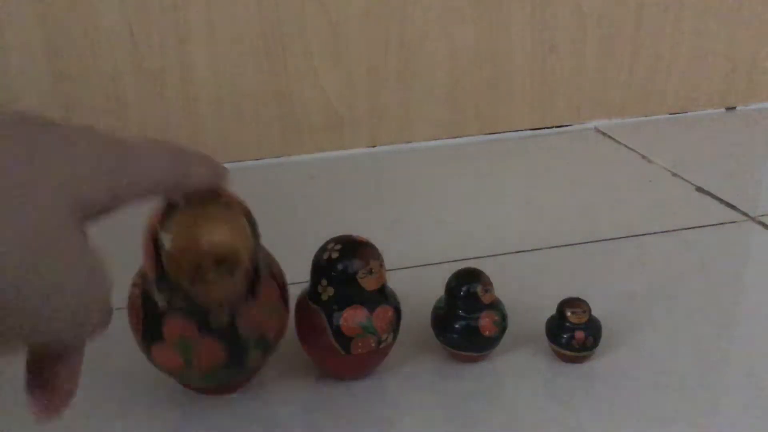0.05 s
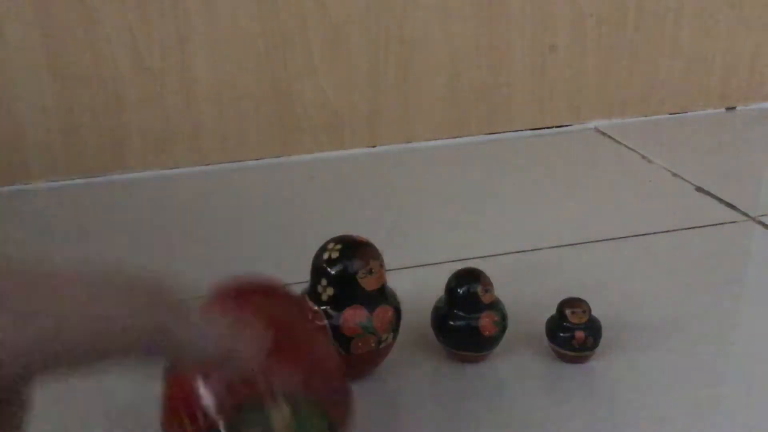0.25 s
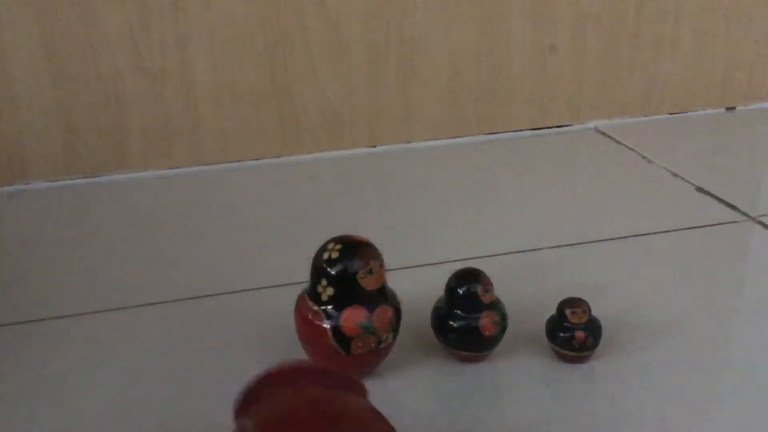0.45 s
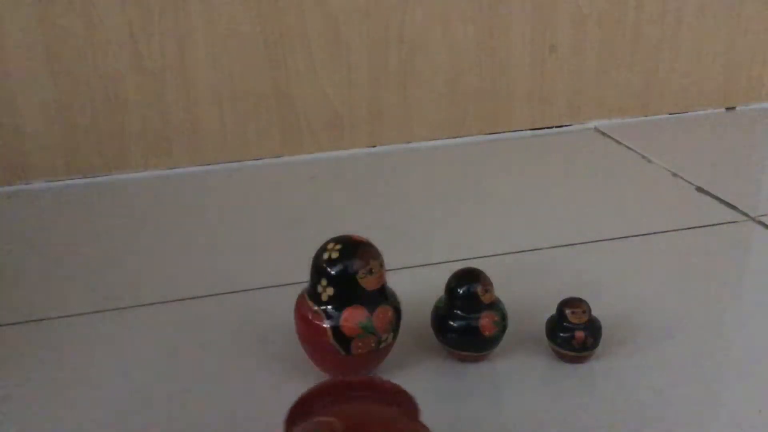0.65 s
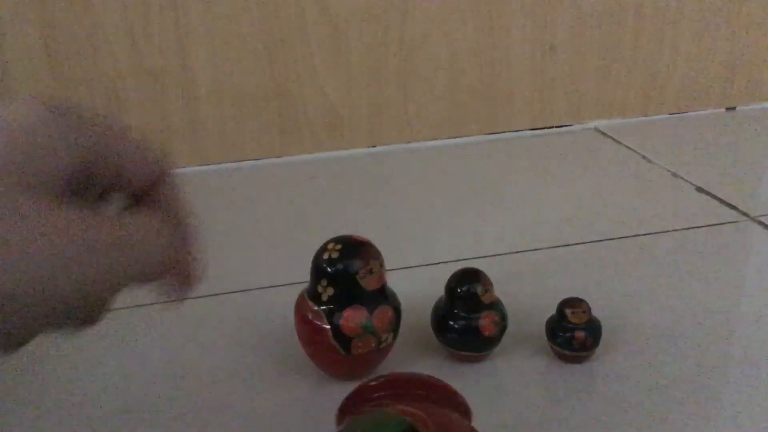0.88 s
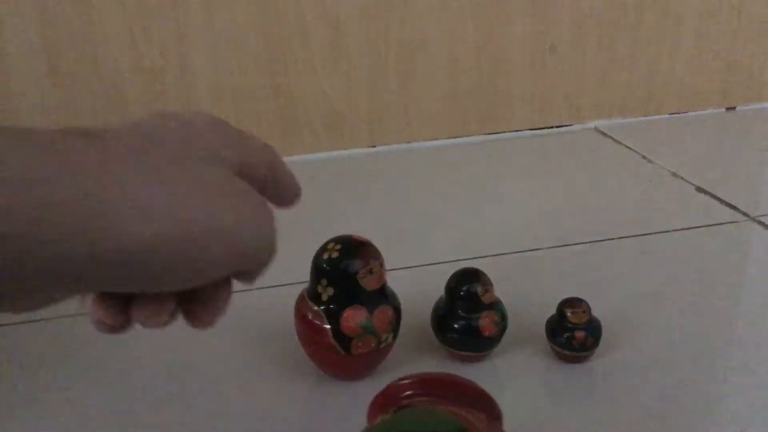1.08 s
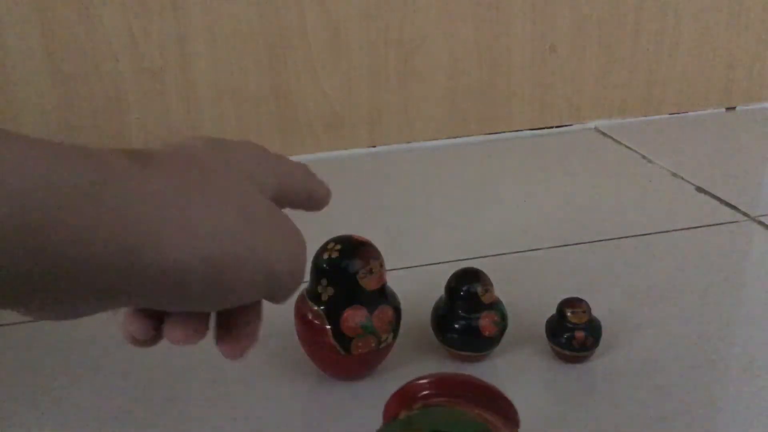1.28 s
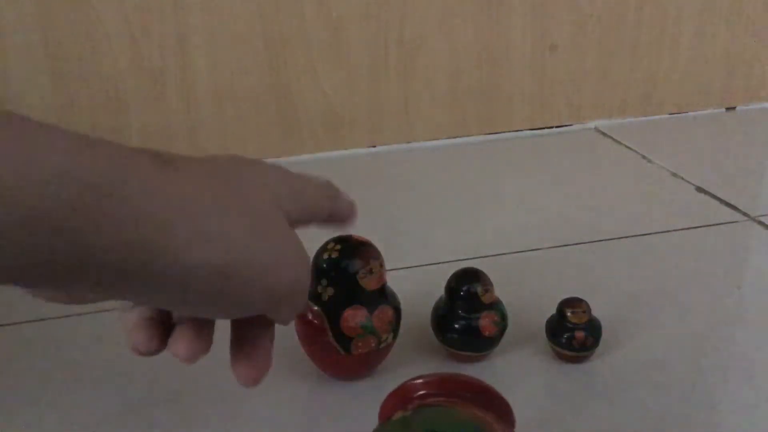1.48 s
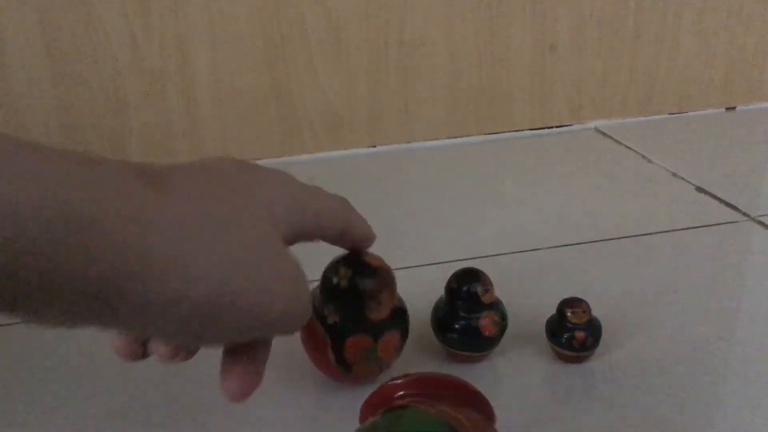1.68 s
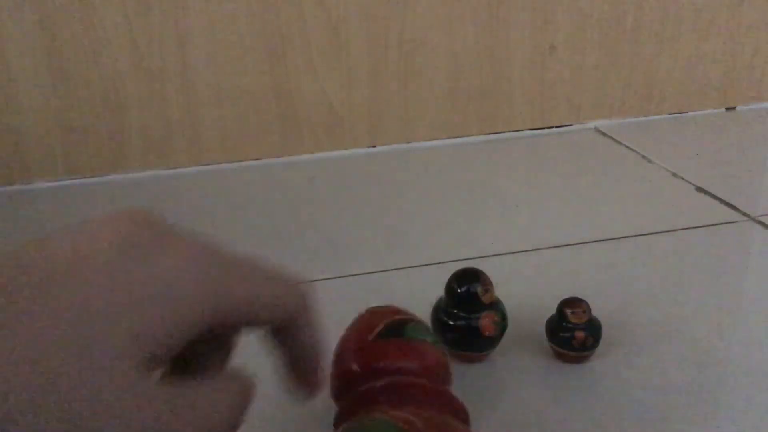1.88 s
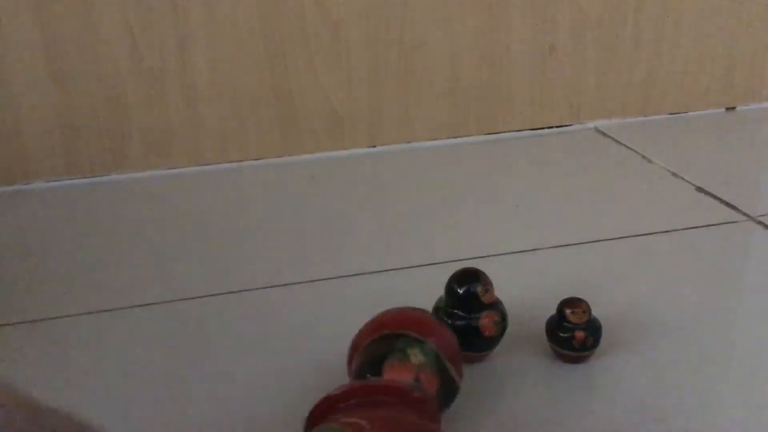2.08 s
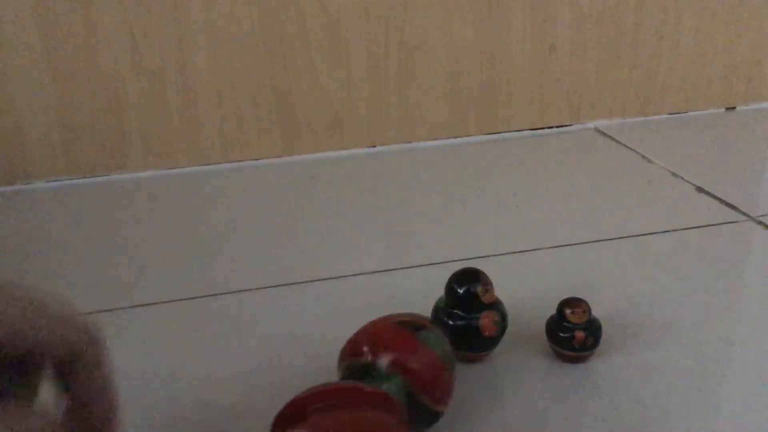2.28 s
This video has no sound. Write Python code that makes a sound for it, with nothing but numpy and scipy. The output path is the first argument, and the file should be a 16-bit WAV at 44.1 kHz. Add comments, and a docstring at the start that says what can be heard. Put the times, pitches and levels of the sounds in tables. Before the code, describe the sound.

Sharp wooden clacks sound nearby as a large hollow doll topples on tile and rattles briefly. A second later a smaller doll falls, bumps another and rolls with light taps, over a faint low hum in a small room.

```python
"""Two hollow wooden nesting dolls, toppled by a finger, clack onto a tiled floor close to a wall.
The big doll bounces and chatters on its rim; the smaller falls, rolls and rattles against its neighbours.
Each impact excites a shell: a click, a dense short ring and a few damped modes. Rolling is a stream
of tiny impacts. Every contact reflects from the wall and dies away in a small room with a low hum."""
import sys
import numpy as np
from scipy import signal
from scipy.fft import rfft, irfft
from scipy.io import wavfile

SR = 44100
rng = np.random.default_rng(int(sys.argv[2]) if len(sys.argv) > 2 else 0)


def to_wav(s):
    """Save 16-bit WAV."""
    ch = np.atleast_2d(s).T  # columns
    pcm = np.round(np.clip(ch, -1, 1) * 32767)  # PCM
    wavfile.write(sys.argv[1], SR, pcm.astype(np.int16))


N = 108045

# Impacts that favour one band, set by the spot struck: start_s, level_db, tilt_db_per_octave, spot_hz
CLACKS = [(.2676, 9.5, -2.5, 2140), (.3483, 9, -1.5, 2266), (.5067, 5.5, -1, 2827),
          (1.8901, -5.5, -0.5, 2150), (1.9030, 3.5, -3.5, 1620), (1.9241, -17.5, -17, 1390)]  # heavy blows of a doll's belly on the tile
BUMPS = [(1.9724, -2.5, 4, 3520)]  # the smaller doll cracking against its neighbour
# Other impacts: start_s, level_db, tilt_db_per_octave
FOOT_KNOCKS = [(.2257, 2.5, 2.5), (.3687, 1.5, 5.5), (.4048, -6, 0.5), (.4376, -9, 0)]  # the big doll's hollow foot thumping the tile
BIG_KNOCKS = [(.1967, -27.5, -17), (.2611, -7, 10.5), (.4595, -11, 3.5), (.4773, -8.5, 0),
              (.4922, -17.5, 4.5), (.5590, -11, 1.5), (.5698, -15.5, 1), (.5795, -16.5, -4),
              (.6451, -8.5, 1), (.6639, -11.5, -0.5), (.7194, -16, -3)]  # the big doll's rim and seam chattering
SMALL_KNOCKS = [(1.7985, -24.5, -5), (1.8245, -24, -0.5), (1.8549, -17.5, 5.5), (1.8653, -18, -0.5),
                (1.9955, -12, 4.5), (2.013, -13, 2), (2.0295, -18, 1), (2.0405, -17, -7.5),
                (2.3873, -15, 3)]  # the smaller doll's seam rattling
TAPS = [(.5448, -3, 2), (.6298, -9, 1.5), (.6539, -12.5, 1), (.6743, -11.5, 2), (.7129, -22, -16),
        (.7311, -21, -5), (1.9512, -16.5, 0), (2.0525, -26.5, 10), (2.0612, -19, 9), (2.2549, -33, 3),
        (2.3603, -15, 3.5), (2.3795, -17.5, -1), (2.4000, -19.5, 7), (2.4096, -19.5, 4)]  # dry taps of a settling doll on the tile
# Envelopes of rolling and scraping on the tile: time_s, level_db
BIG_ROLL = [(.195, -60), (.224, -54.5), (.33, -50.5), (.53, -56.5), (.6, -41), (.622, -59), (.67, -49),
            (.70, -58.5), (.738, -50.5), (.76, -83)]
SMALL_ROLL = [(1.795, -63), (1.825, -55), (1.945, -52), (2.105, -55), (2.16, -78.5), (2.355, -80),
              (2.39, -47), (2.45, -50)]
# Spectral envelopes of the contacts: frequency_hz, level_db
BELLY = [(40, -43.5), (300, -14), (430, -20.5), (700, -10), (1400, -2.5), (3100, -5.5), (3850, -15.5),
         (4600, -6), (5800, -16), (6500, -8), (8100, -32.5), (9300, -15.5), (11200, -20.5), (16000, -37.5)]
TAP_COLOUR = [(40, -26.5), (320, -12), (420, -8.5), (1000, 0), (1550, 3.5), (2750, -13), (3500, -10.5),
              (4400, -20.5), (6200, -15.5), (16000, -54.5)]
BIG_SHELL = [(40, -36), (165, -2.5), (430, -9.5), (700, 4.5), (1400, 0.5), (2800, -10), (3550, -2),
             (4300, -10.5), (5300, -2.5), (8600, -23.5), (10500, -19.5), (16000, -43.5)]
SMALL_SHELL = [(300, 1.5), (430, -13.5), (700, 0.5), (1500, 0.5), (2500, -8), (3600, -8), (4600, -14.5),
               (6200, -6.5), (8400, -13), (10000, -22), (10900, -15), (16000, -40)]
# Normal modes of the shells: pitch_hz, level_db, t60_s
BELLY_MODES = [(1329, -34.5, 0.084), (1592, -34, 0.12), (2010, -28, 0.055), (2853, -35.5, 0.021),
               (6680, -40, 0.099)]
BIG_MODES = [(327, -31.5, 0.12), (710, -43.5, 0.05), (883, -44.5, 0.3), (1195, -49, 0.59),
             (3390, -42, 0.41), (3650, -32.5, 0.12), (5480, -30, 0.079)]
SMALL_MODES = [(716, -32.5, 0.22), (1323, -23, 0.077), (1527, -34, 0.12), (6000, -23, 0.074),
               (6800, -42.5, 0.06)]
# Wooden bodies by name: colour, modes, ring_db, ring_t60 (in s), spread_s, optional bass_db
BODIES = {"belly": dict(colour=BELLY, modes=BELLY_MODES, ring_db=0, ring_t60=0.06, spread_s=0.00059),
          "foot": dict(colour=BIG_SHELL, modes=BIG_MODES[:4],
          ring_db=5, ring_t60=0.055, spread_s=.0014, bass_db=5.5),
          "big": dict(colour=BIG_SHELL, modes=BIG_MODES, ring_db=0.5, ring_t60=0.071, spread_s=0.0015),
          "tap": dict(colour=TAP_COLOUR, modes=BELLY_MODES[:2],
          ring_db=-1.5, ring_t60=0.076, spread_s=0.00067),
          "bump": dict(colour=SMALL_SHELL, modes=[(3015, -29, 0.068), (3710, -24.5, 0.032)],
          ring_db=0.5, ring_t60=0.059, spread_s=0.00158),
          "small": dict(colour=SMALL_SHELL, modes=SMALL_MODES, ring_db=7.5, ring_t60=0.079, spread_s=0.001704)}
# Reflections from the wall and skirting: delay_s, level_db
ECHOES = [(.00388, -13.5), (.0068, -24)]
# Partials of the hum: pitch_hz, level_db
HUM = [(70, -54), (100, -53.5), (102.3, -62.5)]
# Spectral envelope of the room noise: frequency_hz, relative_level_db
AIR = [(20, -44), (48, 1), (130, -2.5), (220, -13.5), (330, -8.5), (420, -21), (1500, -29.5), (4000, -36),
       (8000, -44), (11500, -44.5), (16000, -64)]

TILT_HZ, RING_DAMPING = 1730, .22  # pivot of treble tilt and decay time; exponent of the ring's decay
THUD_HZ, THUD_PER_DB = 230, 0.5  # heavier blows push the floor longer and gain bass
SPOT_DB, SPOT_OCTAVES = 4.5, .4  # lift and width of the favoured band
MODE_DETUNE, MODE_SPREAD_DB = .012, 1  # modes vary from contact to contact as the doll turns
LEAD_SAMPLES = 64  # silent margin ahead of each contact, so its spread-out sound fits before the onset
ROLL_TICKS_PER_S, ROLL_SPREAD_DB, ROLL_TILT_DB_PER_OCTAVE = 360, 3, 2
ECHO_TOP_HZ, TOP_HZ = 5000, 15900
ROOM_DB, ROOM_T60_S, ROOM_DAMPING, ROOM_BUILD_S = -18.5, 0.14, .15, 0.00092
HUM_WAVER_DB, AIR_DB = 1.5, -58.5


def tile_impacts():
    """Impact excitation: the dolls clack belly first on the tile and tap as they settle."""
    return blows(CLACKS, BODIES["belly"]) + blows(TAPS, BODIES["tap"])


def big_doll():
    """Shell resonance: the big doll rings as its foot thumps, its rim chatters and it rolls."""
    thumps = blows(FOOT_KNOCKS, BODIES["foot"])
    return thumps + blows(BIG_KNOCKS, BODIES["big"]) + rolling(BIG_ROLL, BODIES["big"])


def small_doll():
    """Shell resonance: the smaller doll rings as it hits its neighbour, rattles and rolls."""
    crack = blows(BUMPS, BODIES["bump"])
    return crack + blows(SMALL_KNOCKS, BODIES["small"]) + rolling(SMALL_ROLL, BODIES["small"])


def blows(table, body):
    """Superposition: impacts on one body add; each has its own brightness, and heavier ones thud more."""
    out = np.zeros(N + SR)
    for start_s, level_db, tilt_db, *spot_hz in table:
        bass_db = THUD_PER_DB * level_db + body.get("bass_db", 0)
        sound = undb(level_db) * contact(body, tilt_db, bass_db, *spot_hz)
        onset = int(start_s * SR) - LEAD_SAMPLES
        out[onset:onset + len(sound)] += sound
    return out[:N]


def rolling(curve, body, spots=5):
    """Shot noise: tiny random impacts fall on several spots, each ringing a little differently."""
    ticks = (rng.random(N) < ROLL_TICKS_PER_S / SR) * undb(ROLL_SPREAD_DB * rng.standard_normal(N))
    spot = rng.integers(spots, size=N)
    times, db = np.array(curve).T
    t = np.arange(N) / SR
    envelope = undb(np.interp(t, times, db)) * (t > times[0]) * (t < times[-1])
    force = unit(ticks) * np.sqrt(N) * envelope
    bass_db = THUD_PER_DB * db.max() / 2
    responses = [contact(body, ROLL_TILT_DB_PER_OCTAVE, bass_db) for _ in range(spots)]
    return sum(signal.fftconvolve(force * (spot == k), responses[k])[:N] for k in range(spots))


def contact(body, tilt_db, bass_db, spot_hz=None, size=16384):
    """Convolution: a force pulse of given brightness and bass drives a click, a ring and damped modes."""
    t, hz = np.arange(size) / SR, rfft_hz(size)
    lift_db = SPOT_DB * np.exp(-(np.log2((hz + 1) / spot_hz) / SPOT_OCTAVES) ** 2) if spot_hz else 0
    click = pulse(colour_db(body["colour"], hz) + lift_db)
    detune = 1 + MODE_DETUNE * rng.standard_normal()
    ring = signal.fftconvolve(click, dying_noise(body["ring_t60"], RING_DAMPING, size // 2))[:size]
    response = click + undb(body["ring_db"]) * ring
    for pitch_hz, level_db, t60_s in body["modes"]:
        gain = undb(level_db + MODE_SPREAD_DB * rng.standard_normal())
        tone = np.sin(2 * np.pi * (pitch_hz * detune * t + rng.random()))
        response += gain * tone * np.exp(-np.log(1000) * t / t60_s)
    treble_db = tilt_db * np.log2(1 + (hz / TILT_HZ) ** 2) / 2
    thud_db = bass_db / (1 + (hz / THUD_HZ) ** 4)
    sound = signal.fftconvolve(response, pulse(treble_db + thud_db))[:size]
    return unit(disperse(sound, body["spread_s"]))


def pulse(db):
    """Minimum phase: folding the cepstrum gives the shortest causal click with this spectrum."""
    cepstrum = irfft(np.log(undb(db)))
    half = len(cepstrum) // 2
    cepstrum[1:half] *= 2
    cepstrum[half + 1:] = 0
    return unit(irfft(np.exp(rfft(cepstrum))))


def dying_noise(t60_s, damping, size):
    """Frequency-dependent damping: noise decays in octave bands, the treble sooner."""
    t, hz = np.arange(size) / SR, rfft_hz(size)
    centres_hz = 125 * 2. ** np.arange(8)
    noise, out = rfft(rng.standard_normal(size)), 0
    for centre_hz, row in zip(centres_hz, np.eye(len(centres_hz))):
        band = np.interp(np.log(hz + 1), np.log(centres_hz), row)
        band_t60_s = t60_s * (TILT_HZ / centre_hz) ** damping
        decay = irfft(noise * band, size) * np.exp(-np.log(1000) * t / band_t60_s)
        out = out + unit(decay) * np.sqrt(band.sum())  # energy in proportion to bandwidth
    return unit(out)


def disperse(x, spread_s, points=16):
    """Dispersion: each part of the spectrum takes its own short time to leave the wood."""
    x = np.concatenate([np.zeros(LEAD_SAMPLES), x[:-LEAD_SAMPLES]])
    size = len(x)
    hz = rfft_hz(size)
    group_delay_s = spread_s * np.interp(hz, np.linspace(0, SR / 2, points), rng.random(points))
    spread = irfft(rfft(x) * np.exp(-2j * np.pi * np.cumsum(group_delay_s) * hz[1]))
    fade = np.interp(np.arange(size), [0, LEAD_SAMPLES, size / 2, size - LEAD_SAMPLES], [0, 1, 1, 0])
    return spread * fade


def room(x):
    """Reflection and reverberation: slightly dull wall echoes, then the tail of a small room."""
    t = np.arange(N) / SR
    dull = signal.sosfilt(signal.butter(1, ECHO_TOP_HZ, fs=SR, output="sos"), x)
    near = x + sum(undb(db) * np.interp(t - delay_s, t, dull, left=0) for delay_s, db in ECHOES)
    build_up = 1 - np.exp(-t[:SR] / ROOM_BUILD_S)
    tail = unit(dying_noise(ROOM_T60_S, ROOM_DAMPING, SR) * build_up)
    return near + undb(ROOM_DB) * signal.fftconvolve(near, tail)[:N]


def background():
    """Amplitude and phase modulation: a low hum, as of a fan, wavers over faint room noise."""
    t = np.arange(N) / SR
    waver = lambda points=12: np.interp(t, np.linspace(0, t[-1], points), rng.standard_normal(points))
    hum = 0
    for pitch_hz, level_db in HUM:
        amplitude = np.sqrt(2) * undb(level_db + HUM_WAVER_DB * waver())
        hum += amplitude * np.sin(2 * np.pi * (pitch_hz * t + rng.random()) + 0.26 * waver())
    air = irfft(rfft(rng.standard_normal(N)) * undb(colour_db(AIR, rfft_hz(N))), N)
    return hum + undb(AIR_DB) * unit(air) * np.sqrt(N)


def undb(db):
    """Decibel law: 20 dB is a tenfold amplitude."""
    return 10 ** (np.asarray(db) / 20)


def unit(x):
    """Normalisation to unit energy."""
    return x / np.sqrt(np.sum(x ** 2))


def colour_db(points, hz):
    """Interpolation of a spectral envelope on a log-frequency axis."""
    points_hz, db = np.array(points).T
    return np.interp(np.log(hz + 1), np.log(points_hz), db)


def rfft_hz(size):
    """Fourier analysis: bin frequencies lie SR / size apart."""
    return np.arange(size // 2 + 1) * SR / size


def scene():
    """Superposition: both dolls sound in the room, over the hum."""
    dolls = tile_impacts() + big_doll() + small_doll()
    return (room(dolls) + background())[None]


def record(dry):
    """Band limiting: a steep low-pass filter removes the highest treble."""
    return signal.sosfilt(signal.ellip(8, .2, 70, TOP_HZ, fs=SR, output="sos"), dry)


dry = scene()
out = record(dry)
to_wav(out)
```